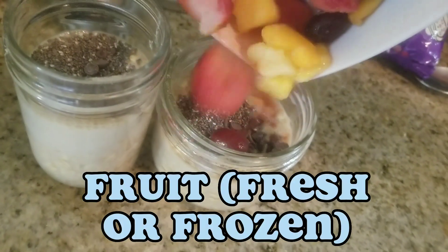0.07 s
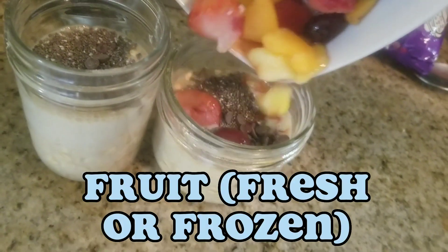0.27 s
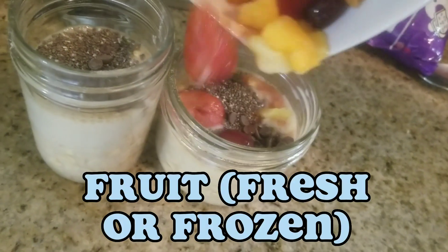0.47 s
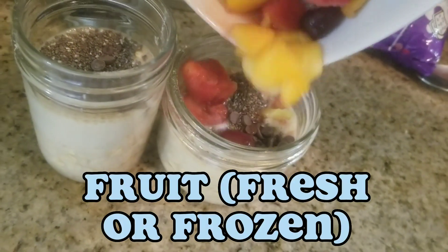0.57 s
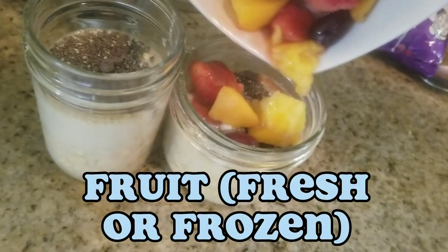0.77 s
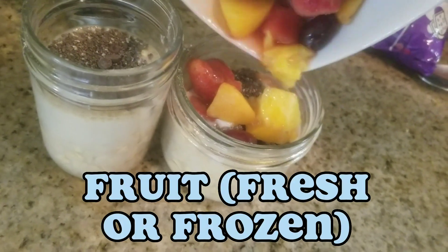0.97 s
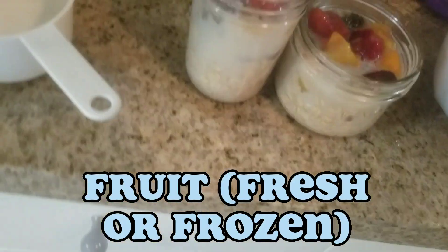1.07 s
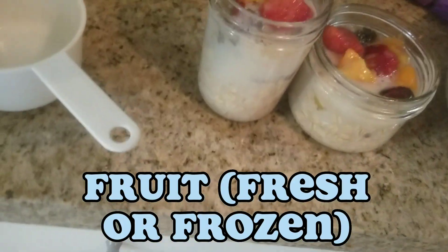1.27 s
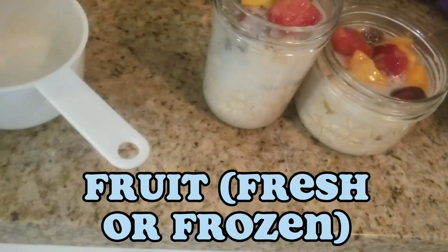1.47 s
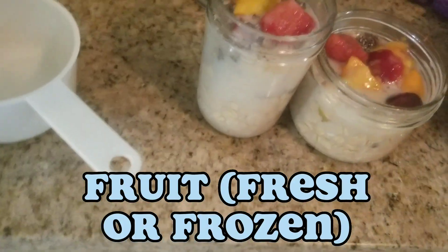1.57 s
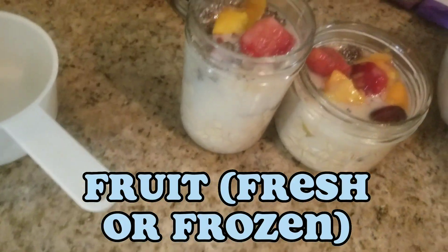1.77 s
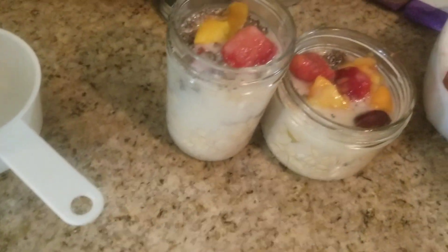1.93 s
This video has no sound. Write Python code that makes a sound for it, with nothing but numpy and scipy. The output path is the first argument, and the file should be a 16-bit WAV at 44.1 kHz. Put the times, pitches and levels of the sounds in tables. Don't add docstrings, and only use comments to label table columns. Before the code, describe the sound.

One hard bowl-on-glass knock rings briefly in a kitchen, among small wet fruit slips and crackles

```python
import sys
import numpy as np
from scipy import signal
from scipy.fft import rfft, irfft, next_fast_len
from scipy.io import wavfile
from scipy.ndimage import uniform_filter1d, map_coordinates

SR = 44100
rng = np.random.default_rng(int(sys.argv[2]) if len(sys.argv) > 2 else 0)


def generate_wav(signal):
    frames = np.transpose(np.atleast_2d(signal))
    scaled = np.clip(frames, -1, 1) * 32767
    pcm = np.round(scaled).astype(np.int16)
    wavfile.write(sys.argv[1], SR, pcm)


def gain_from_decibels(decibels):
    exponent = np.asarray(decibels, float) / 20
    return 10 ** exponent


N = 88200
T = np.arange(N) / SR


def colour(x, table):
    size = next_fast_len(N + 8192)
    hz, db = np.array(table).T
    log_hz = np.log(np.fft.rfftfreq(4096, 1 / SR) + 1)
    log_gain = np.interp(log_hz, np.log(hz), db) * np.log(10) / 20
    cepstrum = irfft(log_gain)
    cepstrum[1:2048] *= 2
    cepstrum[2049:] = 0
    impulse = irfft(np.exp(rfft(cepstrum)))
    return irfft(rfft(x, size) * rfft(impulse, size), size)[:N]


def noise(table):
    last_hz, last_db = table[-1]
    points = list(table) + [(last_hz * 2, last_db - 25)]
    return colour(rng.standard_normal(N), points) * np.sqrt(SR / 2)


def walk(rate):
    hold = int(SR / rate)
    held = np.repeat(rng.standard_normal(N // hold + 1), hold)
    return 1.3 * uniform_filter1d(uniform_filter1d(held, hold), hold)[:N]


def grains(spread_db):
    size = np.minimum(rng.exponential(size=N // 8 + 1), 4)
    x = rng.standard_normal(N) * gain_from_decibels(spread_db * np.repeat(size, 8)[:N])
    return x / x.std()


def ring(start, modes):
    t = np.maximum(T - start, 0)
    total = 0
    for k, (hz, db, t60) in enumerate(modes):
        decay = gain_from_decibels(db - 60 * t / max(t60, .0004))
        total = total + (-1) ** k * decay * np.sin(2 * np.pi * hz * t)
    return total


def fridge():
    # (frequency [Hz], level [dB rms])
    motor = [(59.2, -56.5), (118.4, -66), (177.6, -65), (236.9, -65.5), (268, -63), (296.1, -57.5),
             (355.3, -67.5), (414.5, -66.5)]
    # (frequency [Hz], level [dB per Hz])
    rumble = [(20, -93), (45, -74), (90, -81), (170, -85), (280, -79), (440, -86.5), (560, -98.5),
              (1000, -115)]
    lines = 0
    for hz, db in motor:
        strength = gain_from_decibels(db + 3.0 * walk(9)) * np.sqrt(2)
        phase = 2 * np.pi * rng.random() + .5 * walk(7.8)
        lines = lines + strength * np.sin(2 * np.pi * hz * T + phase)
    bump_s, bump_hz, bump_db, bump_len_s = 1.31, 60, -34.5, 0.035
    swell = np.exp(-((T - bump_s) / bump_len_s) ** 2)
    bump = gain_from_decibels(bump_db) * swell * np.sin(2 * np.pi * bump_hz * T)
    return lines + bump + noise(rumble) * gain_from_decibels(0.94 * walk(15))


def stir():
    # (time [s], level [dB])
    stirring = [(0, -60.5), (.15, -72), (.3, -58.5), (.55, -68.5), (.7, -68), (.95, -68.5), (1.07, -65),
                (1.2, -63.5), (1.45, -68.5), (1.65, -69.5), (2, -80)]
    level_db = np.interp(T, *np.array(stirring).T) + 1.5
    return grains(0.5) * gain_from_decibels(level_db + 2.0 * walk(25))


def slides():
    # (time [s], hold [s], level [dB], brightness [dB])
    slips = [
        (0.056, 0.0029, -51.5, -9),
        (.070, 0.026, -39, 0.5),
        (0.465, 0.01, -50, 0.5),
        (0.604, 0.0087, -40.5, -2.5),
        (0.774, .025, -60, 0),
        (1.072, 0.019, -58.5, 0),
        (1.099, 0.017, -43, -0.5),
        (1.122, 0.031, -53, 2.5),
        (1.179, .03, -57, -1),
    ]
    attack_s, release_s = .0015, 0.0045
    rub = grains(0)
    low = signal.sosfilt(signal.butter(4, 8500, "low", fs=SR, output="sos"), rub)
    rub = grains(0)
    high = signal.sosfilt(signal.butter(4, 8500, "high", fs=SR, output="sos"), rub)
    out = 0
    for start, hold, db, bright_db in slips:
        t = T - start
        shape = np.clip(t / attack_s, 0, 1) * np.exp(-np.maximum(t - hold, 0) / release_s)
        out = out + gain_from_decibels(db) * shape * (low / gain_from_decibels(bright_db) + high * gain_from_decibels(bright_db))
    return out


def ticks():
    # (time [s], peak level [dB], pitch [Hz])
    tick_list = [(.020, -48, 6000), (0.108, -34, 6500), (.177, -38, 12000), (.195, -40.5, 12200),
                 (.361, -34.5, 10400), (0.381, -44, 11500), (.517, -46.5, 7100), (.607, -35.5, 4630),
                 (.662, -47, 11850), (.687, -40.5, 11000), (.716, -54, 6500), (.789, -43, 11500),
                 (0.8889, -38, 6300), (0.923, -55.5, 5500), (1.0205, -45, 6060), (1.036, -53, 6000),
                 (1.0519, -43.5, 12000), (1.075, -50, 6200), (1.097, -65, 5640), (1.1327, -26.5, 13100),
                 (1.156, -48.5, 4900), (1.2067, -34, 12500), (1.211, -37.5, 6800), (1.27, -50, 5630),
                 (1.335, -49.5, 11100), (1.402, -41, 11500), (1.4501, -41, 12500), (1.6732, -35, 12100)]
    cycles, rise_cycles = 0.98, 1.1
    out = 0
    for start, db, hz in tick_list:
        rise = np.clip((T - start) * hz / rise_cycles, 0, 1)
        out = out + gain_from_decibels(db) * ring(start, [(hz, 6, 7 * cycles / hz)]) * rise
    return out


def fruit():
    # (frequency [Hz], gain [dB])
    skin = [(1500, -18), (2600, -21), (4500, -12.5), (16000, -1.5)]
    return colour(stir() + slides(), skin) + ticks()


def knock():
    # (frequency [Hz], level [dB], t60 [s])
    knock_modes = [(125.9, -9, 0.081), (234.7, -5, .12), (419, -0.5, .06), (678, 5, 0.028),
                   (1164.5, 10, 0.031), (1890, -4.5, .025), (2120, -1.5, 0.037), (2289, -2.5, 0.067),
                   (3129, 1, 0.063), (3256, -2, 0.097), (5013, -6.5, 0.035), (6050, -7.5, 0.011),
                   (6500, -14, .03), (7630, -6, 0.021)]
    # (frequency [Hz], gain [dB])
    crack_colour = [(100, -12.5), (600, -4), (1500, -3.5), (2500, 3), (4200, -10), (6000, -12.5),
                    (9000, -21), (16000, -50.5)]
    start_s, knock_db, rise_s = .2411, -18, 0.00035
    crack_db, hold_s, fall_s = -11, 0.0036, 0.003
    t = T - start_s
    push = (t >= 0) * np.exp(-np.maximum(t - hold_s, 0) / fall_s)
    crack = colour(rng.standard_normal(N) * push, crack_colour) * gain_from_decibels(crack_db)
    return crack + gain_from_decibels(knock_db) * ring(start_s, knock_modes) * np.clip(t / rise_s, 0, 1)


def jar():
    # (frequency [Hz], level [dB], t60 [s])
    glass_modes = [(3671, -2, .07), (5044, -2, .05), (6288, -3, .07), (7628, 4, .1), (10500, -4, .07)]
    thud_modes = [(201, 0.5, .08), (108.6, -4, 0.14), (1710, -22, 0.063)]
    start_s, rise_s, glass_db, thud_db = 1.5655, 0.0014, -55, -40.5
    rise = np.clip((T - start_s) / rise_s, 0, 1)
    glass = gain_from_decibels(glass_db) * ring(start_s, glass_modes)
    thud = gain_from_decibels(thud_db) * ring(start_s, thud_modes)
    return rise * (glass + thud)


def lowpass_both_ways(x, hz):
    return signal.sosfiltfilt(signal.butter(2, hz, fs=SR, output="sos"), x)


def room(x):
    # (band top [Hz], t60 [s])
    decay = [(500, 0.34), (1500, 0.33), (4000, 0.47), (8000, 0.47), (16000, 0.292)]
    gap_s, shared_hz, room_db = 0.0027, 444, -7
    t = T[:SR // 2]
    a, b = rng.standard_normal((2, len(t)))
    pair = np.array([a, lowpass_both_ways(a - b, shared_hz) + b])
    tail, below = 0, 0
    for hz, t60 in decay:
        low = lowpass_both_ways(pair, hz)
        energy_scale = np.sqrt(t60 * SR / np.log(1e6))
        tail = tail + (low - below) * gain_from_decibels(-60 * t / t60) / energy_scale
        below = low
    tail = tail * np.clip(t / gap_s - .5, 0, 1)
    return signal.fftconvolve(x[None], tail)[:, :N] * gain_from_decibels(room_db)


def late(x, delay_s):
    return map_coordinates(x, [np.arange(N) - delay_s * SR], mode="mirror")


def port(k, direct, echo, blow):
    # (frequency [Hz], gain [dB])
    echo_colour = [
        [(200, 1), (700, -5.5), (1700, 0), (4500, 7), (7000, -2.5)],
        [(200, 4), (700, 0), (1700, 1.5), (5000, -3.5)],
    ]
    wall_db = (-8, -24)
    # (frequency [Hz], gain [dB])
    response = [
        [(80, 0), (700, 6.5), (1100, -6.5), (1800, 5.5), (3400, -19), (4100, -42), (9000, -60.5),
         (13000, -15.5)],
        [(200, -1), (700, -5), (4000, 4), (6400, 11), (8500, -7.5), (11500, 10), (14000, 0), (16000, -14)],
    ]
    # (frequency [Hz], level [dB per Hz])
    air = [
        [(200, -80.5), (400, -93.5), (650, -87), (1000, -105), (1250, -100), (1520, -88), (1900, -109),
         (2600, -117)],
        [(200, -88.5), (400, -78), (650, -102), (900, -105), (1200, -102), (1550, -106), (2000, -113),
         (2600, -118)],
    ]
    # (frequency [Hz], level [dB per Hz])
    hiss = [
        [(1500, -118), (3500, -117), (6500, -126), (8500, -131), (10500, -121), (12000, -113), (15000, -111)],
        [(1500, -119), (3500, -116), (6500, -112), (8500, -128), (10500, -114), (12000, -112), (15000, -117)],
    ]
    lag_s, wall_s = (.0003, 0)[k], .016
    arriving = late(direct + colour(echo, echo_colour[k]), lag_s)
    wall = gain_from_decibels(wall_db[k]) * late(blow, wall_s)
    own_noise = noise(air[k]) * gain_from_decibels(1.8 * walk(12)) + noise(hiss[k])
    return colour(arriving + wall, response[k]) + own_noise


def scene():
    hum = fridge()
    close = fruit() + jar()
    blow = knock()
    echo = room(blow + gain_from_decibels(2) * close)
    direct = blow + close + hum
    return np.array([port(k, direct, echo[k], blow) for k in (0, 1)])


def band_limit(x):
    return signal.sosfilt(signal.butter(12, 16640, fs=SR, output="sos"), x)


def record(dry):
    change_s, fade_s, top_hz, bass_hz = 1.056, .012, 15600, 32
    fade_in = np.clip((T - change_s) / fade_s, 0, 1)
    x = dry * np.where(T < change_s, 1, fade_in)
    x = signal.sosfilt(signal.ellip(6, .2, 30, top_hz, fs=SR, output="sos"), x)
    x = signal.sosfilt(signal.butter(2, bass_hz, "high", fs=SR, output="sos"), x)
    return band_limit(x)


dry = scene()
out = record(dry)
generate_wav(out)
```